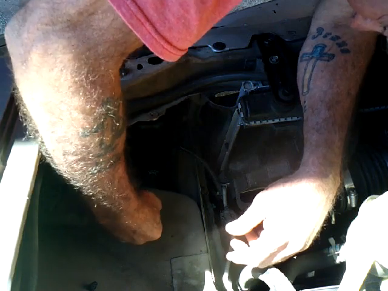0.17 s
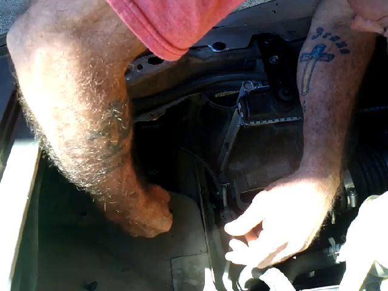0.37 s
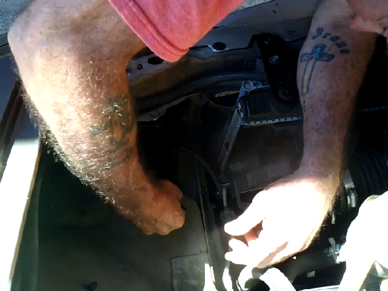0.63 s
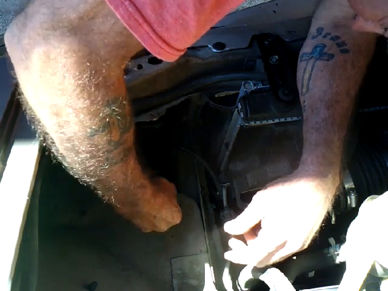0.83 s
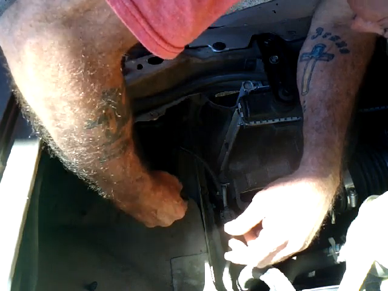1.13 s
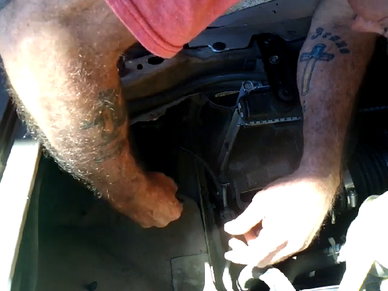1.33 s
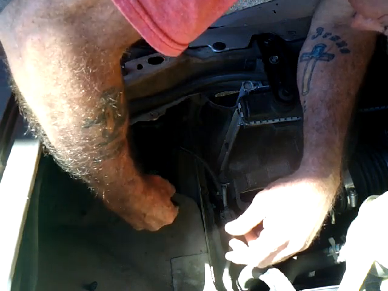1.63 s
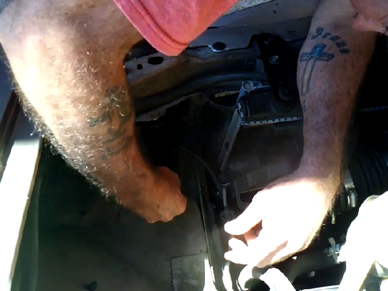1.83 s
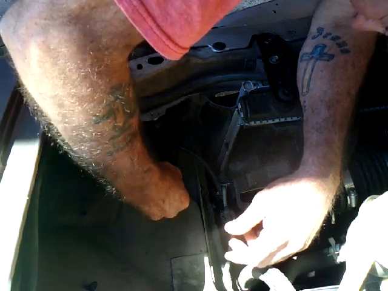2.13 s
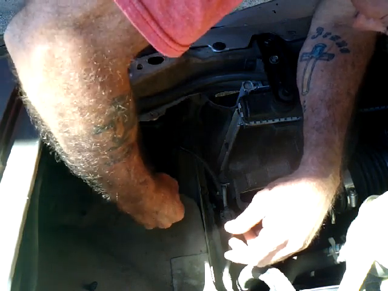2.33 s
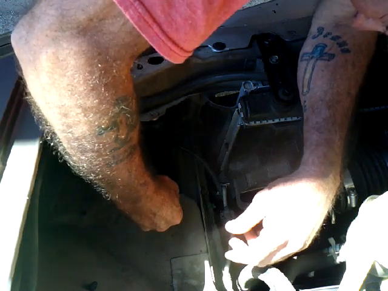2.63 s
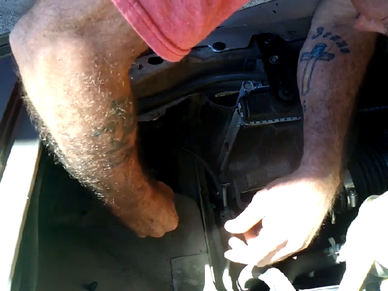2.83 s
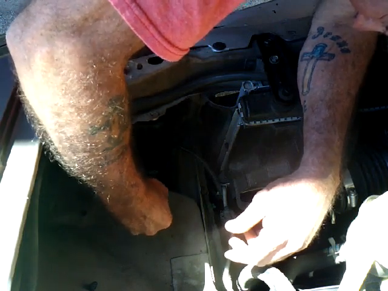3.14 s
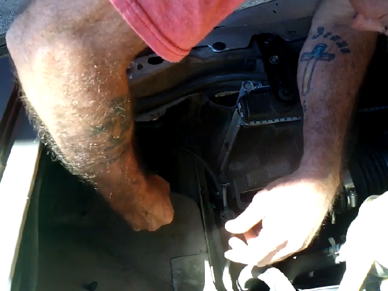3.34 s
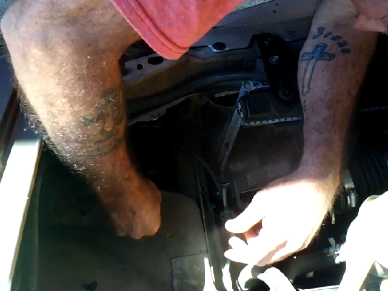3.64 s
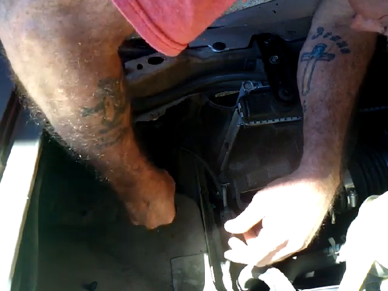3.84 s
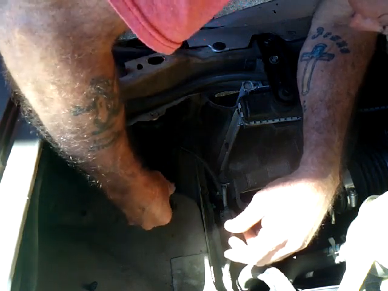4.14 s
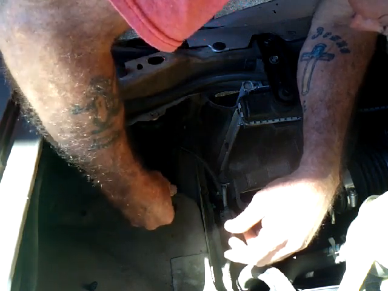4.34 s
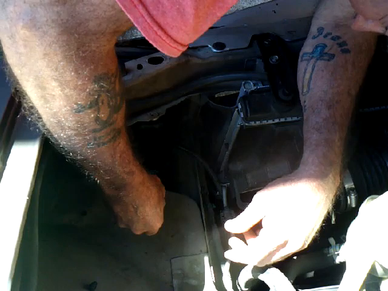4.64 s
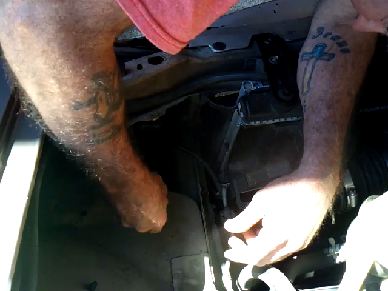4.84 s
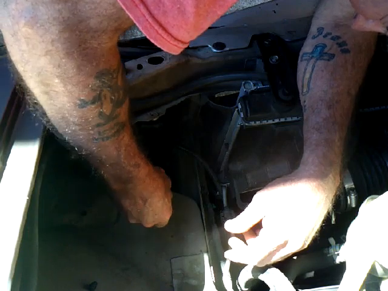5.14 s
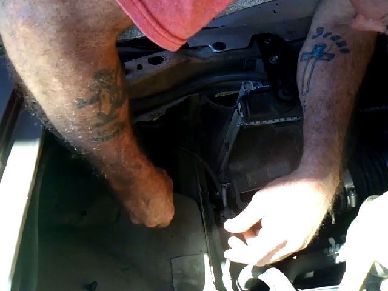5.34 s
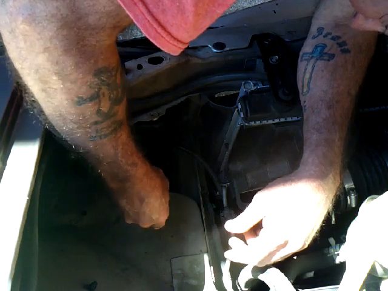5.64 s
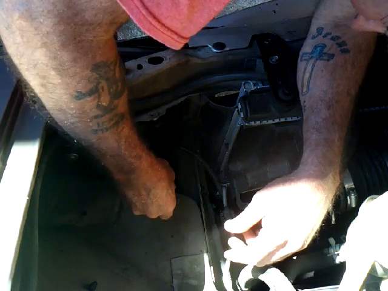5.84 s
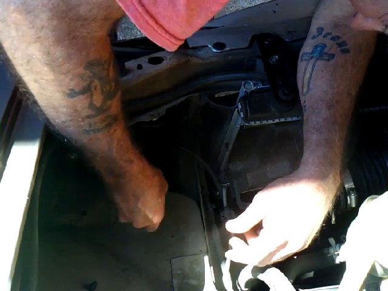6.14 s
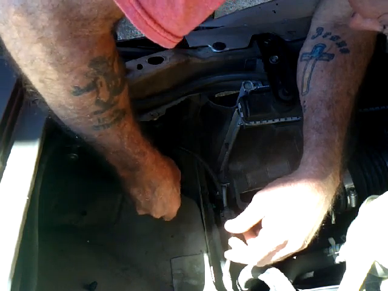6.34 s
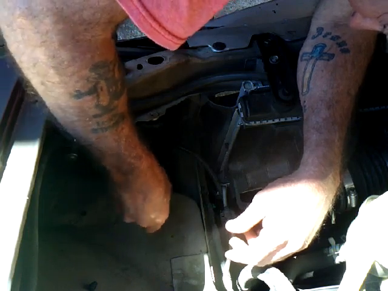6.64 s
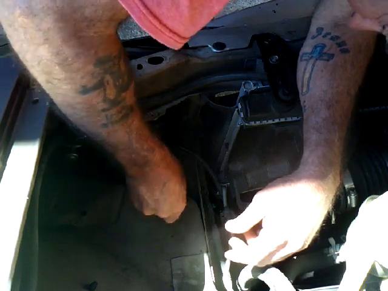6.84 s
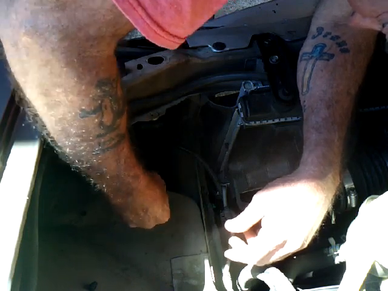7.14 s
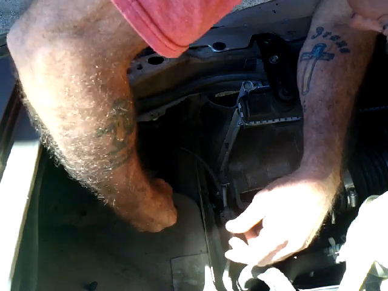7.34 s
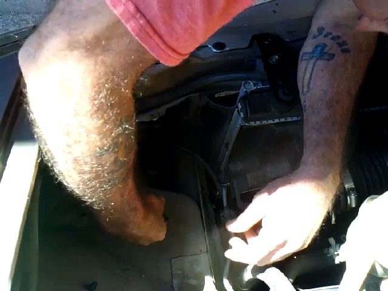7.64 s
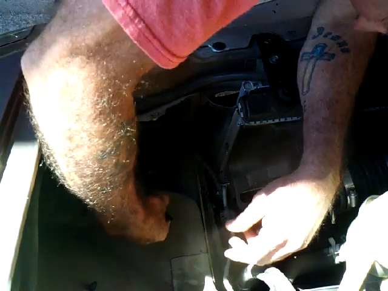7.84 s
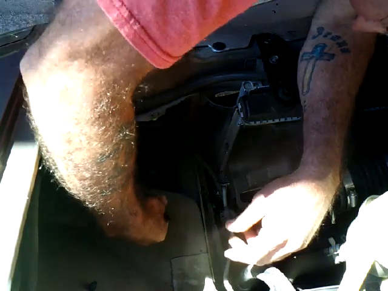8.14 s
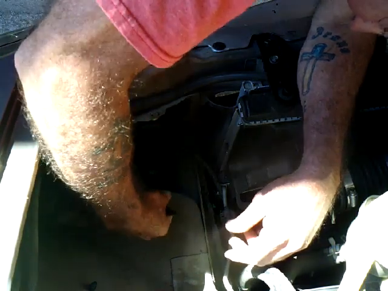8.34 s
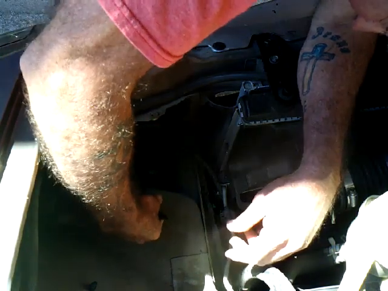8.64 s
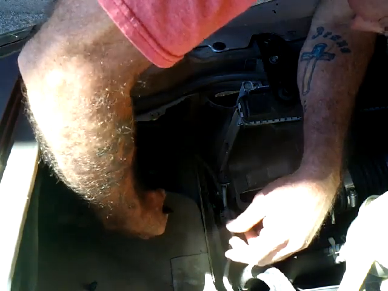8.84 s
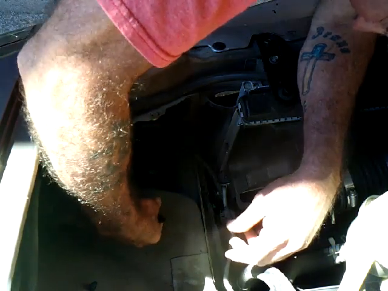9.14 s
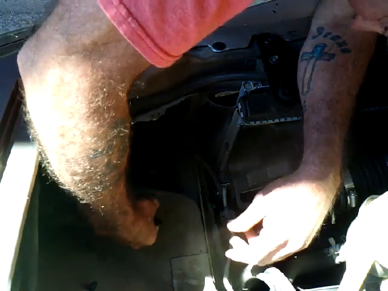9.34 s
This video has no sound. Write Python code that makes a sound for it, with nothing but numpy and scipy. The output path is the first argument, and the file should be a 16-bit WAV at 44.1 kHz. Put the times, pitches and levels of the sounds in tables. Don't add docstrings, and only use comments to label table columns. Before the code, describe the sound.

Rapid back-and-forth wire brushing on small metal parts, about eight strokes a second, bright and scratchy with tiny snaps and clicks. Low hollow panel knocks accompany it, soft early, booming in the middle, moderate later, with a brief squeaky rasp in between. Heard outdoors at a car's open front by a small close microphone with narrow, peaky treble, over soft air noise and faint late traffic wash.

```python
import sys
import numpy as np
from scipy import signal
from scipy.fft import rfft, irfft, next_fast_len
from scipy.io import wavfile
from scipy.ndimage import uniform_filter1d, map_coordinates

SR = 44100
rng = np.random.default_rng(int(sys.argv[2]) if len(sys.argv) > 2 else 0)


def attenuation_scalar(level_db):
    decades = np.asarray(level_db, float) / 20
    return 10 ** decades


def wrap_up_sound(samples):
    columns = np.atleast_2d(samples).T
    tamed = np.clip(columns, -1, 1)
    steps = np.round(tamed * 32767).astype(np.int16)
    wavfile.write(sys.argv[1], SR, steps)


N = 418068
TIME = np.arange(N) / SR
TURN_S = 7.05

# f/Hz, level/dB per Hz
HISS_COLOUR = [(800, -45.5), (2000, -30), (5100, -11.5), (5700, 0), (6400, 7), (7000, 2.5), (7400, -2.5),
               (9000, -7)]


def unit(x):
    return x / np.sqrt(np.mean(x ** 2) + 1e-20)


def filtered(x, response):
    m = next_fast_len(N + SR // 2)
    return irfft(rfft(x, m) * response(np.fft.rfftfreq(m, 1 / SR)), m)[..., :N]


def resonance(hz, width_hz):
    return lambda f: 1j * f * width_hz / (hz * hz - f * f + 1j * f * width_hz)


def coloured(x, points):
    hz, db = np.transpose(points)
    return unit(filtered(x, lambda f: attenuation_scalar(np.interp(np.log(f + 1), np.log(hz + 1), db))))


def curve(points):
    return np.interp(TIME, *np.transpose(points))


def wobble(rate):
    s = np.arange(0, N / SR + .002, .001)
    knots = rng.standard_normal(int(N * rate / SR) + 4)
    return np.interp(TIME, s, map_coordinates(knots, [s * rate]))


def scattered(start, grains):
    length = grains.shape[1]
    places = start[:, None] + np.arange(length)
    return np.bincount(places.ravel(), grains.ravel(), N + length)[:N]


def brush():
    hiss, scrape, drag = pressure()
    bright = tips(per_second=5000, spread_db=3.2, clumps=170, steady=.66)
    sound = air_hiss(hiss, bright) + wires(hiss) + squeaks(scrape)
    sound += prongs(scrape, bright) + housing(scrape, bright)
    rough = tips(per_second=1500, spread_db=1.5, clumps=120, steady=1.5)
    return sound + shaken_body(scrape, drag, rough) + loom_clip(drag * rough)


def pressure():
    # t/s of most pressure, hiss level/dB, length/ms, panel drag level/dB re hiss away from the body,
    # leaning in slowly and letting go fast
    pushes = [(0.055, -49.5, 180, 10), (0.399, -51, 98, 3.5), (0.566, -48.5, 74, 5),
              (0.658, -39.5, 26, 4), (0.814, -33, 50, -2.5), (0.95, -35.5, 78, 6),
              (1.095, -37, 71, -5), (1.282, -48.5, 33, 5.5), (1.337, -35, 55, -1.5),
              (1.574, -33.5, 43, -4), (1.674, -34.5, 41, 7), (1.734, -44.5, 33, 16.5),
              (1.816, -45.5, 160, 10.5), (1.907, -41, 42, 6), (1.978, -39, 30, 2),
              (2.055, -42, 74, 3), (2.177, -44.5, 64, 8), (2.297, -33.5, 71, 3), (2.428, -36, 57, -3),
              (2.671, -40.5, 59, 8.5), (2.939, -46, 60, 5.5), (3.357, -41.5, 26, 8),
              (3.765, -45, 61, 8.5), (3.886, -39, 65, 8), (4.015, -46, 79, 6), (4.052, -40.5, 19, 11),
              (4.145, -40, 57, 6), (4.271, -50.5, 90, 9),
              (4.506, -43.5, 38, 15), (4.585, -42, 63, 6), (4.748, -41, 51, 4), (4.921, -39, 41, 13.5),
                   (5.049, -38.5, 66, 7), (5.291, -35, 57, 5.5), (5.415, -40.5, 58, 5), (5.551, -38, 78, 5),
                   (5.667, -41, 46, 11), (5.788, -41, 96, 11), (6.029, -47.5, 72, -2.5), (6.14, -44, 75, 6),
                   (6.277, -41.5, 45, -3.5), (6.516, -35, 40, -1), (6.768, -43, 63, -3),
                   (6.953, -40, 110, 7.5), (7.331, -41, 31, -3), (7.625, -53, 44, 19.5),
                   (8.063, -45.5, 47, 11), (8.339, -37.5, 27, -3), (8.395, -42.5, 43, 11),
                   (8.592, -41, 39, 5), (8.684, -39.5, 59, 14.5), (9.285, -41, 43, 8.5),
                   (9.376, -40, 69, 15.5)]
    pulls = [(0.125, -44.5, 65, 3.5), (0.255, -45.5, 42, 4), (0.692, -28.5, 25, -4),
             (1.017, -34.5, 23, 0), (1.16, -31.5, 35, 1.5), (1.404, -35, 55, 4),
             (1.513, -40, 61, 12.5), (2.491, -40.5, 84, 8.5), (2.712, -37.5, 46, 12.5),
             (2.82, -35, 43, 3), (2.986, -35.5, 46, 6), (3.055, -45.5, 96, -16),
             (3.119, -55, 70, 21.5), (3.235, -33.5, 46, 1.5), (3.406, -36, 51, -1.5),
             (3.445, -28.5, 14, -11), (3.492, -34, 27, -4), (3.591, -49, 220, 9.5),
             (3.652, -39, 49, 2), (4.335, -53, 33, 6.0),
             (4.409, -44.5, 45, 5.5), (4.648, -36.5, 33.5, 11.5), (4.808, -32, 38, 8),
                  (5.114, -49, 34, -9), (5.156, -37, 38, 4), (5.881, -35, 33, 4.5), (6.368, -41.5, 64, 9),
                  (6.6, -37.5, 51, 7.5), (7.092, -45.5, 42, -4), (7.389, -41.5, 43, 9.5),
                  (7.435, -36.5, 35, 8), (7.55, -40, 36, 7), (8.014, -48, 9, 3)]
    catches = [(6.209, -50, 22, 9), (6.84, -41, 86, 6.5), (7.177, -42, 37, 0), (7.214, -37.5, 23, 5.5),
               (7.72, -37.5, 53, 7), (7.798, -38, 65, 3), (7.944, -30.5, 26, 4.5), (8.045, -42, 34, 11),
               (8.101, -37.5, 31, 5.5), (8.172, -46.5, 30, 15), (8.228, -36, 34, 12.5),
               (8.43, -31.5, 36, 1.5), (8.541, -45, 17, 7), (8.664, -38, 45, -1), (8.628, -46.5, 34, 9),
               (8.774, -53, 81, 6), (9.007, -48.5, 30, 0), (7.863, -41.5, 12, 15.5),
               (7.423, -44.5, 46, 14.5), (8.808, -33, 26, 5), (8.861, -39, 28, 12),
               (8.907, -33.5, 39, 10.5), (9.043, -33, 24, 0), (9.1, -36, 25, 5), (9.138, -30, 30, 6),
               (9.36, -34.5, 36, 1)]
    sweeps = [(0.739, -41, 37, 4.5), (1.052, -42.5, 16, 11.5), (1.2, -49.5, 47, 8), (1.253, -46.5, 23, -5),
              (1.43, -36.5, 33, -12), (1.65, -41.5, 42, 0), (2.92, -54, 60, 1), (3.174, -38, 61, 9.5),
              (3.255, -39, 21, 6.5), (3.3, -50.5, 41, -8), (7.115, -49.5, 33, -5), (7.301, -46.5, 68, 6.5),
              (7.52, -43, 280, -11), (8.118, -47, 19, 1)]
    # t/s, scrape level/dB re hiss
    grip = [(0, -4), (.6, -2.5), (1.2, -3), (1.8, -1), (2.4, -0.5), (3, -2), (3.6, -2), (4.2, -1),
            (4.6, 0.5), (5.5, 1), (6.5, 1.5), (7.3, -5), (7.5, 0.5), (7.6, 4.5), (7.75, -1), (8.5, -0.5),
            (9.48, -0.5)]
    kinds = [pushes, pulls, catches, sweeps]
    rules = [(.78, 1.135, 1.135, 0), (.35, .96, 1.135, .4), (.19, .96, 1.45, .4), (.5, 3, 3, .4)]
    s, db, length, drag_db = np.vstack(kinds).T[:, :, None]
    rise, up, down, extra_db = np.repeat(rules, [len(k) for k in kinds], axis=0).T[:, :, None]
    scrape_db = np.interp(s, *np.transpose(grip)) - .22 * (db + 48) + extra_db
    ms = np.arange(0, 1000 * N / SR + 1)
    off = ms - 1000 * s
    flank_ms = np.maximum(length * np.where(off < 0, rise, 1 - rise), 2)
    fall_db = 20 * (np.abs(off) / flank_ms) ** np.where(off < 0, up, down)
    power = attenuation_scalar(2 * db - fall_db)
    layers = [power, power * attenuation_scalar(2 * scrape_db), power * attenuation_scalar(2 * drag_db)]
    return [np.interp(1000 * TIME, ms, np.sqrt(p.sum(0))) for p in layers]


def tips(per_second, spread_db, clumps, steady):
    sizes = attenuation_scalar(spread_db * np.minimum(rng.exponential(size=N), 4)) * rng.standard_normal(N)
    slips = (rng.random(N) < per_second / SR) * sizes
    tufts = (rng.random(N) < clumps / SR) * rng.random(N)
    settle = signal.lfilter([1], [1, -np.exp(-1 / (.009 * SR))], tufts)
    return unit((unit(slips) + rng.standard_normal(N)) * (steady + settle))


def air_hiss(hiss, bright):
    turn_db = [5.5, -7, -2, 1, 1.5, 5.5, -1.5, 3.2]
    tilted = [(hz, db + more) for (hz, db), more in zip(HISS_COLOUR, turn_db)]
    sound = np.where(TIME > TURN_S, coloured(bright, tilted), coloured(bright, HISS_COLOUR))
    return attenuation_scalar(4.0) * hiss * attenuation_scalar(1.4 * wobble(25)) * sound


def wires(hiss):
    draw = rng.random((1600, 3))
    start = (draw[:, 0] * (N - 1)).astype(int)
    hz = 1600 + 5600 * draw[:, 1:2]
    t = np.arange(SR // 40) / SR
    colour_db = np.interp(hz, *np.transpose(HISS_COLOUR)).clip(-12, 0)
    size = hiss[start, None] * attenuation_scalar(colour_db - 1.5 - 4.14 * np.log(draw[:, 2:] + 0.045))
    return scattered(start, size * attenuation_scalar(-60 * t / .035) * np.sin(2 * np.pi * hz * t))


def squeaks(scrape):
    # t/s, level/dB re scrape
    squeak_levels = [
        (7.2, -16),
        (7.4, -8),
        (7.6, -8),
        (7.7, -13),
    ]
    length, glide = .03, .08
    draw = rng.random((1800, 4))
    start = (draw[:, 0] * (N - 1)).astype(int)
    t = np.arange(round(length * SR)) / SR
    hz = 1000 * 3.1 ** draw[:, 1:2] * (1 + glide * (draw[:, 2:3] - .7) * t / length)
    size_db = np.interp(start / SR, *np.transpose(squeak_levels))[:, None] + 7 * draw[:, 3:]
    grains = attenuation_scalar(size_db) * np.sin(np.pi * t / length) ** 2 * np.sin(2 * np.pi * hz * t)
    return scrape * scattered(start, grains)


def prongs(scrape, bright):
    # f/Hz, width/Hz, level/dB
    prong_modes = [(1470, 320, -5), (1782, 161, 7), (2180, 240, -3.5), (2712, 150, 4.5), (3360, 360, -3),
                   (3960, 230, -3), (4524, 90, -4)]
    rub = scrape * (bright + 0.44 * rng.standard_normal(N))
    sound = np.zeros(N)
    for k, (hz, width_hz, db) in enumerate(prong_modes):
        wandering = rub * attenuation_scalar(2 * wobble(30))
        sound += (-1) ** k * attenuation_scalar(db + 9) * filtered(wandering, resonance(hz, width_hz))
    return sound


def housing(scrape, bright):
    # f/Hz, level/dB per Hz
    housing_colour = [(500, -25), (1100, 11), (2000, -2.5), (3500, -7), (4700, -17.5), (5300, -15.5),
                      (7000, -26.5)]
    # t/s, level/dB re scrape
    rasp_levels = [
        (7.36, -38),
        (7.4, -11),
        (7.58, -5),
        (7.66, -40),
    ]
    # f/Hz, level/dB per Hz
    rasp_colour = [(1500, -29), (2500, -6.5), (4500, 1.5), (5500, -3.5), (7000, -24.5)]
    body = attenuation_scalar(-10.0) * coloured(bright, housing_colour)
    return scrape * (body + attenuation_scalar(curve(rasp_levels)) * coloured(bright, rasp_colour))


def shaken_body(scrape, drag, rough):
    near = signal.butter(2, 290, "high", fs=SR, output="sos")
    boom = signal.sosfilt(near, panel(0.0035, 0, count=1, soft=0.86)[0])
    clack = bracket(0.00017, 0, count=1)[0]
    sound = np.zeros(N)
    for force, body, db in [(drag, boom, 3), (np.sqrt(drag * scrape), clack, 1.5)]:
        sound += attenuation_scalar(db) * signal.fftconvolve(force * rough, body / np.linalg.norm(body))[:N]
    return sound


def loom_clip(pull):
    # t/s, level/dB re drag
    loom_levels = [(0, -18), (2, -17), (4.2, -13.5), (4.5, 5.5), (4.76, -8.5), (5.1, 1), (5.5, 3.5),
                   (6, -1.5), (6.6, 3.5), (7.1, -6), (7.6, -4.5), (8.3, -17.5), (9.48, -21.5)]
    return filtered(pull * attenuation_scalar(curve(loom_levels) + 22.5), resonance(513, 28))


def ticks():
    # t/s, peak level/dB, ring f/Hz
    edge_ticks = [(0.3925, -40, 1470), (0.6265, -40, 1490), (0.7706, -29, 1570), (0.8664, -45, 1790),
                  (1.001, -33, 1750), (1.0507, -29, 1840), (1.151, -32, 4500), (1.3876, -41, 2860),
                  (1.512, -39, 1740), (1.6342, -33, 2850), (1.648, -23.5, 1790), (1.729, -27.5, 1710),
                  (1.8672, -40, 1770), (1.8877, -31, 1740), (1.9594, -45, 1770), (1.9997, -33, 1740),
                  (2.0258, -30, 1750), (2.2223, -48, 2690), (2.2454, -33, 1730), (2.295, -29, 1770),
                  (2.379, -33, 1750), (2.6165, -30, 1890), (2.655, -30, 1720), (2.707, -26, 1580),
                  (2.805, -30, 1870), (2.9812, -31, 3100), (3.1518, -29.5, 1730), (3.2355, -33, 1470),
                  (3.3887, -37, 1480), (3.4416, -39, 1450), (3.4867, -29, 1590), (3.64, -27, 1890),
                  (3.836, -34, 1400), (3.8748, -24, 1750), (4.009, -39, 1800), (4.0322, -33, 1480),
                  (4.1025, -35, 1740), (4.3286, -48, 1800),
                  (4.493, -29.5, 2650), (4.6434, -22, 2610), (4.7785, -31, 2640), (4.9114, -21.5, 2710),
                  (4.9581, -32, 1780), (5.2165, -28.5, 2620), (5.3976, -24, 2810), (5.6513, -18, 1720),
                  (5.7039, -38, 1570), (6.0896, -30.5, 1750), (6.355, -23.5, 2760), (6.4626, -27.5, 1750),
                  (6.5755, -22, 1840), (6.6992, -30, 1780), (6.843, -19, 1740), (7.083, -33, 1310),
                  (7.1741, -31, 1350), (7.207, -25.5, 3430), (7.2799, -44, 1656), (7.3692, -34, 1800),
                  (7.606, -29, 1500), (7.7189, -32, 1440), (7.8083, -21, 1570), (7.8635, -25, 1600),
                  (7.9414, -30, 1500), (8.011, -29, 1570), (8.0426, -26.5, 1490), (8.105, -27.5, 2820),
                  (8.1708, -23, 1570), (8.2266, -25.5, 1710), (8.3085, -28, 1610), (8.3764, -26.5, 2780),
                  (8.537, -32, 1800), (8.6243, -37, 1560), (8.9057, -31, 1480), (9.0294, -31, 1800),
                  (9.0982, -33, 1770)]
    force, pings, t = np.zeros(N + SR), np.zeros(N + SR), np.arange(SR // 20) / SR
    for s, db, hz in edge_ticks:
        rattle = attenuation_scalar(db - 4.5 - 60 * t / .049) * rng.standard_normal(len(t))
        ping = attenuation_scalar(db - 9 - 60 * t / .051) * np.sin(2 * np.pi * hz * t) * np.minimum(t / 0.0014, 1)
        force[round(s * SR):][:len(t)] += rattle
        pings[round(s * SR):][:len(t)] += ping
    band = signal.butter(1, [900, 4200], "band", fs=SR, output="sos")
    return pings[:N] + signal.sosfilt(band, force[:N])


def snaps():
    # t/s, peak level/dB
    sharp_bursts = [(0.6515, -16), (0.6927, -22.5), (1.144, -14), (1.1483, -31.5), (1.278, -17),
                    (1.3924, -20.5), (1.4065, -43), (2.476, -21.5), (3.2352, -20.5), (3.4402, -34.5),
                    (4.494, -29), (4.586, -20), (5.217, -31.5), (5.704, -30.5), (6.576, -29.5), (6.772, -21),
                    (7.946, -27), (4.4013, -20), (5.528, -17.5), (6.209, -18), (6.843, -15), (7.174, -14.5),
                    (7.208, -26), (7.7198, -28), (7.79, -32), (7.808, -17.5), (8.17, -25), (8.2234, -17.5),
                    (8.428, -31.5), (8.4332, -30), (8.665, -25.5), (8.812, -29.5), (8.9076, -22.5),
                    (9.045, -31.5), (9.097, -27), (9.139, -31), (9.356, -15)]
    force, t = np.zeros(N + SR), np.arange(SR // 20) / SR
    for s, db in sharp_bursts:
        force[round(s * SR):][:len(t)] += attenuation_scalar(db - 7 - 60 * t / .03) * rng.standard_normal(len(t))
    peak = resonance(6400, 1800)
    return filtered(force[:N], lambda f: peak(f) + 0.044 * (f > 1500))


def knocks():
    # t/s, boom peak level/dB, clack level/dB re boom
    light_blows = [(0.342, -24.5, -29), (0.693, -23.5, 2.5), (0.935, -15, -29), (0.952, -17, -22),
                   (1.012, -19, -3), (1.092, -25, -3), (1.157, -22, -36), (1.316, -22.5, -6),
                   (1.573, -21.5, -1), (1.731, -24, -15), (2.249, -21.5, 2), (2.382, -25, -6),
                   (2.429, -21.5, -4), (2.48, -21, -0.5), (2.712, -21, 1.5), (2.813, -19, -1.5),
                   (2.965, -20, -25), (3.449, -24.5, -1), (3.588, -23, -24), (3.651, -21.5, 1),
                   (4.138, -20, -0.5), (0.109, -31, -4), (0.625, -37, 1), (1.153, -37, 11),
                   (1.178, -21, -9), (3.388, -24.5, -2), (3.487, -38, -5), (4.106, -42, 4)]
    slam_blows = [(4.403, -25.5, -16), (4.494, -21, 3), (4.591, -8, -5), (4.632, -24, -21), (4.824, -2, -4),
                  (4.862, -14.5, -14), (4.908, -16, -26), (5.052, -2, -4), (5.161, -19, -15),
                  (5.216, -22.5, 3), (5.299, -5, -3), (5.466, -21.5, -2.5), (5.549, -4, -1.5),
                  (5.654, -12, -7.5), (5.705, -21.5, 0.5), (5.788, -4, -4.5), (5.895, -24, -23),
                  (6.039, -11, -7.5), (6.278, -2.5, -6), (6.517, -6.5, -2.5), (6.576, -15, -2),
                  (6.773, -13, 0), (6.934, -21.5, -6), (4.656, -17, -13), (5.398, -34.5, -8),
                  (5.59, -14.5, -20), (5.83, -20, -19), (6.358, -29, -17), (6.464, -24.5, -0.5),
                  (6.699, -33.5, 5), (6.846, -19, -7)]
    tap_blows = [(7.089, -20, -3.5), (7.18, -27.5, 3), (7.216, -21.5, -19), (7.414, -18.5, -6),
                 (7.562, -28, -5), (7.948, -16.5, 0), (7.968, -15.5, -11), (8.23, -34, 8), (8.33, -26, 4.5),
                 (8.448, -14, -24), (8.633, -20, 1.5), (8.684, -15.5, -9), (8.81, -21.5, -16),
                 (8.926, -16, -8), (9.143, -9.5, -6), (9.363, -14.5, -13), (9.39, -18, -9),
                 (9.063, -25, -10), (9.28, -27, -12), (8.659, -22, -15), (9.1, -24, 1), (8.839, -23.5, -6),
                 (7.742, -24, 1), (7.334, -24, -11), (7.367, -25.5, -3), (7.608, -20, 0), (8.107, -27, 6),
                 (8.173, -39, -2), (8.427, -34, 10), (8.908, -19, -1.5)]
    # f/Hz, level/dB per Hz
    loose_colour = [(200, -20.5), (400, 9.0), (600, 2), (760, 1.5), (1000, -1.5), (2000, -24.5), (5000, -44.0)]
    out, t = np.zeros(N + SR), np.arange(SR * 2 // 5) / SR
    blows = light_blows + slam_blows + tap_blows
    when, peak_db, _ = np.transpose(blows)
    turned = when > TURN_S
    booms = panel(.002, scatter_db=1.2, count=len(blows), soft=(peak_db < -11.6) | turned, turned=turned)
    clacks = bracket(.0004, scatter_db=2.5, count=2 * len(blows))
    loose = coloured(rng.standard_normal(N + SR), loose_colour)
    for k, (s, db, clack_db) in enumerate(blows):
        out[round((s - .004) * SR):][:len(t)] += attenuation_scalar(db + .7) * booms[k]
        rattle = loose[round(s * SR) // 2:][:len(t)] * attenuation_scalar(-60 * t / 0.19) * np.minimum(t / 0.0011, 1)
        out[round((s - .005) * SR):][:len(t)] += attenuation_scalar(db + clack_db - 14.0) * rattle
        contacts = [(.0062, min(db + 11, 2.5)), (.0012, -1.5)]
        for j, (lead, blow_db) in enumerate(contacts):
            hz = (900 + 150 * j) * attenuation_scalar(.5 * rng.normal())
            tick = attenuation_scalar(14 - 60 * t / .013) * np.sin(2 * np.pi * hz * t)
            contact = attenuation_scalar(db + clack_db + blow_db - 20.5) * (tick + clacks[2 * k + j])
            out[round((s - lead) * SR):][:len(t)] += contact
    return out[:N]


def panel(attack, scatter_db, count, soft=0, turned=0):
    # f/Hz, level/dB, t60/s, sign of motion at the microphone
    panel_modes = [(178, -25, .25, -1), (205, -14.5, .36, 1), (234, -4.5, .17, -1), (243, -12, .17, -1),
                   (262, -19, .4, 1), (287, -4, .078, 1), (387, -4, .028, -1)]
    soft_db = [1, -3, -4.5, 2.5, 4, 0, -6.5]
    turn_db = [1, -1, -0.5, 0.5, 0.5, 1, -12.5]
    shift_db = np.multiply.outer(soft, soft_db) + np.multiply.outer(turned, turn_db)
    return ring(panel_modes, np.transpose(panel_modes)[3] * attenuation_scalar(shift_db), attack, scatter_db, count)


def bracket(attack, scatter_db, count):
    # f/Hz, level/dB, t60/s
    bracket_modes = [(418, -2, 0.032), (509, 3.5, 0.072), (670, 1.5, 0.034), (739.5, -3, 0.12),
                     (835, 0, 0.024), (941, 2, 0.044), (1011, 3.5, 0.014), (1227, -3.5, 0.039),
                     (1472, -11, 0.086), (1800, -20.5, 0.082)]
    return ring(bracket_modes, (-1.) ** np.arange(len(bracket_modes)), attack, scatter_db, count)


def ring(modes, signs, attack, scatter_db, count):
    hz, db, t60 = np.transpose(modes)[:3, :, None]
    t = np.arange(SR * 2 // 5) / SR
    tones = attenuation_scalar(db - 60 * t / t60) * np.sin(2 * np.pi * hz * t) * (1 - np.exp(-t / attack))
    return (signs * attenuation_scalar(scatter_db * rng.standard_normal((count, len(modes))))) @ tones


def distant_road():
    # t/s, level/dB
    road_levels = [
        (0, -78),
        (3.999, -53),
        (6.5, -52.5),
        (8, -48),
        (8.9, -41),
        (9.48, -35.5),
    ]
    # f/Hz, level/dB per Hz
    tyre_colour = [(40, -36), (100, 3), (300, -3.5), (900, -1.5), (1600, -11), (3000, -28.5)]
    return attenuation_scalar(curve(road_levels)) * coloured(rng.standard_normal(N), tyre_colour)


def outdoor_air():
    # f/Hz, level/dB per Hz
    air_colour = [(15, -23), (25, -8), (263, 0), (443, -14), (729, -13.5), (3500, -31.5), (5100, -42),
                  (7300, -37)]
    return attenuation_scalar(-45.5 + 1.5 * wobble(3)) * coloured(rng.standard_normal(N), air_colour)


def scene():
    high_pass = signal.butter(2, 130, "high", fs=SR, output="sos")
    close = signal.sosfilt(high_pass, brush() + knocks() + snaps() + ticks())
    return (close + outdoor_air() + distant_road())[None]


def faint_treble_lost(x):
    hz, _, z = signal.stft(x, SR, nperseg=512)
    power = np.abs(z) ** 2
    smooth = uniform_filter1d(uniform_filter1d(power, size=7, axis=-2), size=3, axis=-1)
    share = smooth / power.sum(-2, keepdims=True) ** .36
    treble = (hz > 3200) & (hz < 7200)
    faint = treble[:, None] & (share < np.quantile(share[:, treble], .015))
    return signal.istft(z * np.where(faint, attenuation_scalar(-20), 1), SR, nperseg=512)[1][:, :N]


def roll_off(x):
    return signal.sosfilt(signal.butter(12, 9400, fs=SR, output="sos"), x)


def record(dry):
    rounded = dry / (1 + np.abs(dry / .95) ** 6) ** (1 / 6)

    def band_limit(f):
        skirt = attenuation_scalar(-33) * np.exp((7400 - np.maximum(f, 7400)) / 220)
        return 1 / (1 + (f / 7380) ** 200) + skirt

    kept = filtered(faint_treble_lost(rounded), band_limit)
    mirror = kept * np.cos(2 * np.pi * 16000 * TIME)
    image = filtered(mirror, lambda f: np.exp(-((f - 8830) / 200) ** 4))
    return roll_off(kept + attenuation_scalar(-21) * image)


dry = scene()
out = record(dry)
wrap_up_sound(out)
```